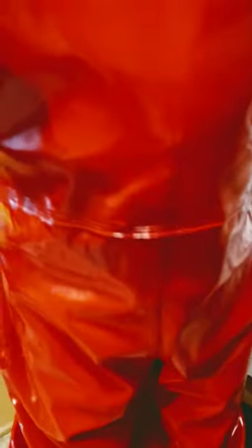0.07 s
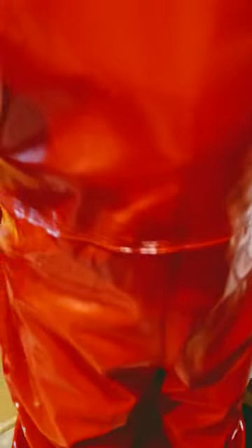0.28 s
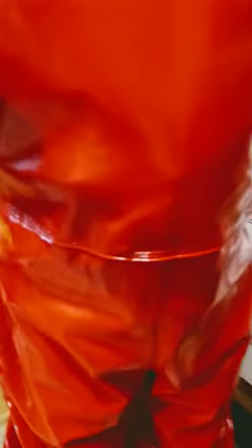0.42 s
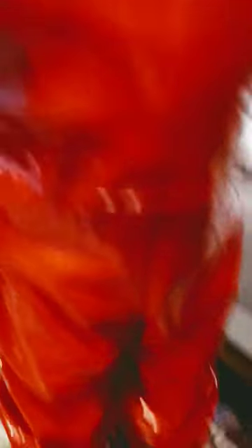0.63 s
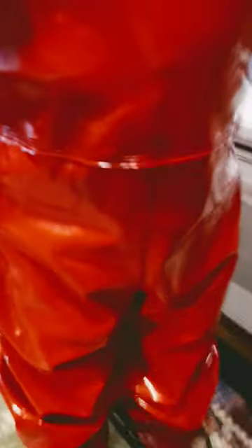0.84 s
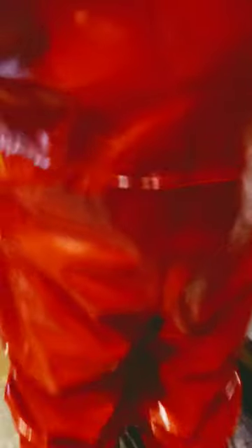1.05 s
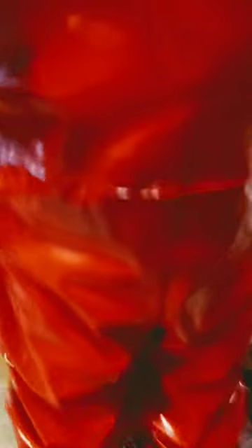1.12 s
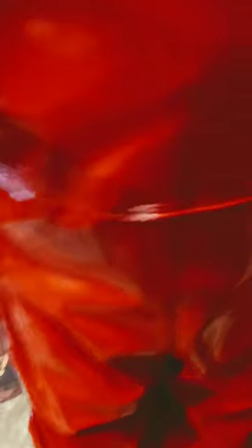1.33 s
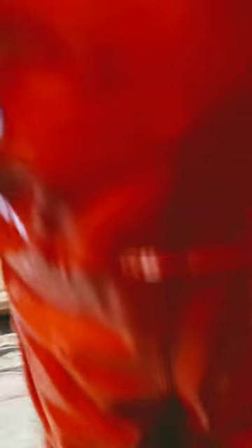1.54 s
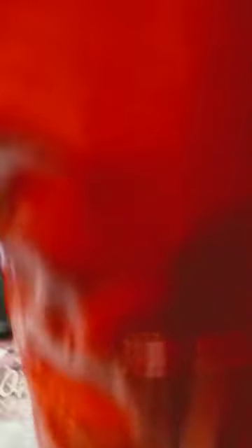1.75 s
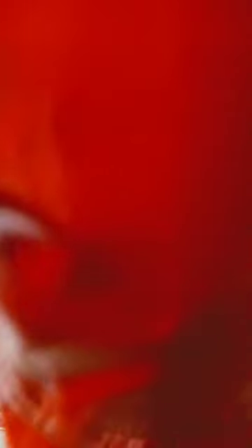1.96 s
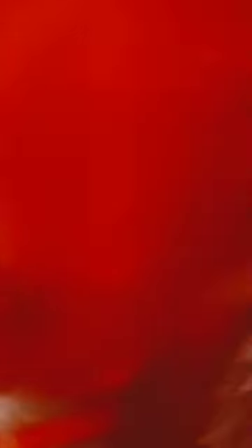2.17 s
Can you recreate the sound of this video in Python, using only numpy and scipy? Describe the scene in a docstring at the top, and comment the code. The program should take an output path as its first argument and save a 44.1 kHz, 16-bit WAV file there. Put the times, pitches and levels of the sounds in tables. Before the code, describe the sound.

Stiff, shiny coated fabric crinkling and snapping sharply right against the microphone, in a quiet room

```python
"""Stiff coated suit rubbing two microphone ports

A person in a stiff, shiny coated suit moves about indoors, the fabric right against the left and right ports.
Folds brush over each port: grainy noise split into rumble, scrape and hiss, each with its own level.
Creases buckle with sharp snaps: a break, decaying micro-cracks and a push of air, ringing the port's cavity.
Each side leaks weakly to the other, over a faint room tail and a quiet steady room tone."""
import sys
import numpy as np
from scipy import signal
from scipy.fft import rfft, irfft, next_fast_len
from scipy.io import wavfile
from scipy.ndimage import uniform_filter1d, map_coordinates

SR = 44100
rng = np.random.default_rng(int(sys.argv[2]) if len(sys.argv) > 2 else 0)


def output_pcm(signal):
    """Save a mono or channel-first signal as 16-bit PCM at the path in sys.argv[1].

    Samples are clipped to [-1, 1] before scaling.
    """
    pcm = np.clip(np.atleast_2d(signal).T, -1, 1) * 32767
    wavfile.write(sys.argv[1], SR, np.round(pcm).astype(np.int16))


N = 97020  # 2.2 s of samples


def amp(db):
    """Decibels to gain."""
    return 10 ** (np.asarray(db) / 20)


def unit(x):
    """Scale a signal to rms 1."""
    return x / np.sqrt(np.mean(x ** 2) + 1e-20)


def colour(points, hz):
    """Gain interpolated between (f/Hz, level/dB) points on a log frequency axis."""
    f, db = np.transpose(points)
    return amp(np.interp(np.log(hz + 1), np.log(f), db))


def filtered(x, response):
    """Filter x by a complex response of frequency, padded so that tails do not wrap round."""
    padded = next_fast_len(N + SR // 2)
    hz = np.fft.rfftfreq(padded, 1 / SR)
    return irfft(rfft(x, padded) * response(hz), padded)[..., :N]


def wobble(rate):
    """A smooth random curve with `rate` knots a second."""
    knots = rng.standard_normal(N // 4)
    return map_coordinates(knots, [np.arange(N) * rate / SR], mode="wrap")


# steady background colour at each port: (f/Hz, relative level/dB)
LEFT_TONE_COLOUR = [(30, -22.5), (160, 1), (600, -13.5), (2200, -18), (6000, -33)]
RIGHT_TONE_COLOUR = [(30, -12), (200, 5.5), (1300, -21.5), (10000, -18.5), (15000, -26.5)]
LEFT_TONE_DB, RIGHT_TONE_DB = -69.5, -76  # rms before the microphone


def room_tone(spectrum, db):
    """Quiet steady background: noise shaped by a fixed spectrum."""
    noise = rng.standard_normal(N)
    return amp(db) * unit(filtered(noise, lambda hz: colour(spectrum, hz)))


FOLD_DB = 3  # rms depth of the shifting resonances


def folded(x, size=512):
    """Short-lived resonances that come and go as the folds change shape."""
    spectrogram = signal.stft(x, nperseg=size)[2]
    field = rng.standard_normal(spectrogram.shape)
    field = uniform_filter1d(field, 3, axis=0)  # smooth across frequency
    field = uniform_filter1d(field, 7, axis=1)  # smooth across time
    return signal.istft(spectrogram * amp(FOLD_DB * unit(field)), nperseg=size)[1][:N]


# folds sliding over a port; rise and fall are the times to cover 20 dB:
# (t/s at full level, hold/s, rise/s, fall/s, rumble level/dB, scrape level/dB, hiss level/dB)
LEFT_RUBS = [(0.22, 0.0097, 0.0068, 0.025, -20, -28, -37.5), (0.324, 0.012, 0.02, 0.02, -56, -62.5, -57.5),
             (0.484, 0.014, 0.041, 0.021, -37.5, -52.5, -89),
             (0.518, 0.072, 0.041, 0.16, -61, -64.5, -69.0),
             (0.614, 0.0053, 0.025, 0.062, -64, -53.5, -52.5),
             (0.732, 0.043, 0.029, 0.039, -43, -38, -46.5),
             (0.854, 0.0033, 0.028, 0.043, -41, -40.5, -51.5), (0.937, 0.04, 0.023, 0.064, -54, -61.5, -71),
             (1.023, 0.0057, 0.0092, 0.092, -51.5, -58.5, -64), (1.214, 0.045, 0.058, 0.066, -63, -62, -64),
             (1.369, 0.0088, 0.003, 0.012, -53, -45, -59), (1.441, 0.017, 0.11, 0.1, -42.5, -42.5, -55),
             (1.527, 0.021, 0.0083, 0.2, -52.5, -45, -66), (1.615, 0.005, 0.0035, 0.088, -38.5, -40, -47.5),
             (1.669, 0.087, 0.031, 0.015, -49, -47.5, -57), (1.784, 0.079, 0.041, 0.11, -56.5, -49.5, -65),
             (1.927, 0.064, 0.012, 0.077, -49.5, -45.0, -45),
             (2.018, 0.031, 0.0082, 0.07, -49.5, -46.5, -65.0),
             (2.16, 0.048, 0.014, 0.05, -61.5, -45.5, -47.5)]
RIGHT_RUBS = [(0.214, 0.0086, 0.005, 0.026, -46.5, -49, -50),
              (0.484, 0.0041, 0.015, 0.022, -38.5, -55, -79), (0.741, 0.051, 0.028, 0.064, -44, -74, -90),
              (1.022, 0.001, 0.01, 0.017, -49.5, -71.5, -68.5),
              (1.298, 0.0041, 0.04, 0.0051, -49.5, -62, -54),
              (1.326, 0.015, 0.003, 0.0062, -41, -54.5, -50),
              (1.37, 0.0034, 0.0044, 0.028, -29, -46, -30.5), (1.453, 0.016, 0.061, 0.078, -46.5, -42, -31),
              (1.529, 0.042, 0.01, 0.016, -45.5, -53.5, -40),
              (1.613, 0.011, 0.0014, 0.062, -42.5, -47, -32), (1.675, 0.068, 0.055, 0.016, -49, -45, -37),
              (1.797, 0.044, 0.028, 0.099, -54.5, -49.5, -49.5),
              (2.141, 0.0037, 0.049, 0.088, -57, -54.5, -63.5)]
# colour of the rubbing at each port: (f/Hz, relative level/dB)
LEFT_RUB_COLOUR = [(30, -42), (60, 1), (140, 8.5), (220, -1.5), (400, -6), (650, -7.5), (950, 0.5),
                   (1400, -6.5), (2400, -9), (3700, -17.5), (5200, -14.5), (7300, -18), (9700, -18.5),
                   (13000, -29), (15000, -33)]
RIGHT_RUB_COLOUR = [(30, -16.5), (70, -14.5), (130, -8.5), (240, -4.5), (450, -5), (750, -1.5),
                    (1400, -4.5), (2100, -13), (3500, -13), (5400, -21.5), (7500, -11.5), (10000, -8.5),
                    (11500, -16.5), (13400, -11), (15000, -36.5)]
# depth of a fold's uneven drag: one value each for rumble, scrape and hiss [depth/dB]
JUDDER_DEPTH_DB = [5, 3, 1.47]
JUDDER_PER_S = 130  # knots in the uneven drag
RUMBLE_TOP_HZ, HISS_FROM_HZ = 324, 3900
GRAIN_PER_S, GRAIN_DB = 900, 1.5  # tiny slips of the coating: knots a second, depth
CRACKLE_PER_S, CRACKLE_SIZE = 280, 2.45  # small creases giving way inside a rub


def below(hz, edge):
    """Gain of a third-order low-pass at the edge."""
    return 1 / np.sqrt(1 + (hz / edge) ** 6)


def above(hz, edge):
    """High-pass gain whose power complements the low-pass."""
    return np.sqrt(1 - below(hz, edge) ** 2)


def rubs(strokes, spectrum):
    """Grainy friction in three bands at one port; each fold swells, holds and slides off."""
    t = np.arange(N) / SR
    slips = unit(rng.standard_normal(N) * amp(GRAIN_DB * wobble(GRAIN_PER_S)))
    crackle = (rng.random(N) < CRACKLE_PER_S / SR) * rng.standard_normal(N) * CRACKLE_SIZE
    friction = folded(slips) + crackle
    drag = wobble(JUDDER_PER_S)

    power = np.zeros((3, N))  # strokes add as power, since their noises are unrelated
    for start, hold, rise, fall, *levels_db in strokes:
        swell = np.maximum(start - t, 0) / rise
        slide_off = np.maximum(t - start - hold, 0) / fall
        shape_db = -20 * (swell + slide_off)
        power += np.outer(amp(levels_db), amp(shape_db)) ** 2

    bands = [lambda hz: below(hz, RUMBLE_TOP_HZ),
             lambda hz: above(hz, RUMBLE_TOP_HZ) * below(hz, HISS_FROM_HZ),
             lambda hz: above(hz, HISS_FROM_HZ)]
    out = np.zeros(N)
    for band_power, band, depth_db in zip(power, bands, JUDDER_DEPTH_DB):
        juddering = friction * amp(depth_db * drag)
        texture = unit(filtered(juddering, lambda hz: band(hz) * colour(spectrum, hz)))
        out += np.sqrt(band_power) * texture
    return out


LAG_S_PER_HZ = 7e-8  # delay per Hz; spreads a click into a few quick cycles


def click(centre_hz, octaves, size=8192):
    """A click of energy 1 with a bell-shaped spectrum; its treble trails its bass a little."""
    hz = np.fft.rfftfreq(size, 1 / SR)
    gain = np.exp(-.5 * (np.log2((hz + 1) / centre_hz) / octaves) ** 2) + .0001
    # folding the cepstrum gives minimum phase: the energy comes as early as it can
    cepstrum = irfft(np.log(gain))
    cepstrum[1:size // 2] *= 2
    cepstrum[size // 2 + 1:] = 0
    lag_phase = np.pi * LAG_S_PER_HZ * hz ** 2
    wave = irfft(np.exp(rfft(cepstrum) - 1j * lag_phase))
    wave = wave * np.cos(np.pi / 2 * np.arange(size) / size) ** 2  # fade out
    return wave / np.linalg.norm(wave)


# creases buckling: (t/s, port 0 left 1 right, level/dB over 1 ms, centre f/Hz, width/octaves,
# crumple decay/s, push of air level/dB relative to the crack)
SNAPS = [ (.2147, 0, -17.5, 3800, 0.94, 0.00042, 1.5), (0.2141, 0, -14, 197, 0.55, .0001, -16),
         (0.2173, 0, -14, 3520, 0.87, 0.00022, -13), (0.4036, 0, -29.5, 170, 1.11, 0.00012, -9.5),
         (0.4189, 0, -20.5, 3020, .68, 0.000088, -10.5), (0.4223, 1, -15.5, 7350, 1.45, 0.00036, -15),
         (.4238, 0, -15, 5900, 3.9, 0.0012, -18), (0.4695, 1, -15, 5300, 1.4, 0.00042, -36),
         (0.4711, 0, -18.5, 1670, 0.71, 0.0006, -15.5), (0.4817, 1, -32.5, 9000, 1, 0.0015, 5),
         (0.4829, 1, -28.5, 500, 1.4, 0.00044, -39), (0.6752, 0, -25, 2230, 0.57, 0.00014, -12),
         (.7590, 0, -26.5, 895, 0.15, 0.0038, -8), (0.8078, 1, -18.5, 3350, 1.18, 0.00015, -15),
         (.8095, 0, -19.5, 1180, 0.93, 0.000055, -11), (0.8529, 1, -27.5, 7200, 1.6, 0.0015, -23),
         (0.8546, 0, -26, 8200, 1.25, 0.00026, -16), (0.969, 0, -40.5, 123, 0.55, 0.00022, -12),
         (1.247, 1, -24.5, 3920, 0.92, 0.0006, -22), (1.2496, 0, -27, 1500, 0.85, 0.00033, -11),
         (1.271, 1, -37, 8140, 1, 0.0021, -29), (1.5285, 0, -31.5, 2960, 0.8, 0.00039, -18),
         (1.6132, 1, -29, 8700, 0.48, .0008, -8.5), (1.6208, 0, -35.5, 8000, 0.62, 0.00039, 1.5),
         (1.6210, 0, -24, 128, 0.47, .0005, -35), (1.7845, 0, -32, 7100, 1.5, 0.00083, -12),
         (1.7847, 1, -30.5, 8300, 0.63, 0.0019, -25), (1.9306, 0, -13.5, 2790, .62, 0.00021, -17.5), ]
# cavity behind the left and the right port: (f/Hz, width/Hz, ring level/dB relative to the direct sound)
CAVITIES = [(7500, 500, -1.5), (8150, 74, 1.5)]
PUSH_HZ, PUSH_OCTAVES = 410, 0.52  # air shoved by a buckling panel
CRUMPLE = 0.9  # initial strength of the micro-cracks, first break = 1


def cavity(hz):
    """Direct sound plus one resonance for each port."""
    return np.array([1 + amp(db) * 1j * hz * width / (centre ** 2 - hz ** 2 + 1j * hz * width)
                     for centre, width, db in CAVITIES])


def snaps(size=8192):
    """Each crease breaks, crumples for a moment, shoves air and rings the port's cavity."""
    out = np.zeros((2, N + size))
    t = np.arange(size) / SR
    for start, port, db, centre_hz, octaves, crumple_s, push_db in SNAPS:
        cracks = CRUMPLE * rng.standard_normal(size) * np.exp(-t / crumple_s)
        cracks[0] = 1  # the first break
        crack = signal.fftconvolve(cracks, click(centre_hz, octaves))[:size]
        push = amp(push_db) * click(PUSH_HZ, PUSH_OCTAVES)
        wave = crack / np.linalg.norm(crack) + push
        first = round(start * SR)
        # the square root turns unit energy into rms 1 over 1 ms
        out[round(port), first:first + size] += amp(db) * np.sqrt(SR / 1000) * wave
    return filtered(out[:, :N], cavity)


# sound reaching the opposite port: (f/Hz, level/dB)
ACROSS_COLOUR = [(100, -28), (300, -28.5), (600, -10), (1500, -26.5), (5000, -26.5), (9000, -22)]
ACROSS_S = 0.0002884  # travel time between the ports


def across(near):
    """Each side leaks to the opposite port, coloured and delayed by the path between them."""
    return filtered(near[::-1], lambda hz: colour(ACROSS_COLOUR, hz) * np.exp(-2j * np.pi * hz * ACROSS_S))


ROOM_DB, ROOM_T60_S = -36, 0.62  # tail level, time to fall 60 dB


def room(near):
    """A faint, short answer of the room: both sides mixed into decaying noise tails."""
    t = np.arange(SR // 2) / SR
    tail = rng.standard_normal((2, len(t))) * amp(-60 * t / ROOM_T60_S)
    tail = tail / np.linalg.norm(tail[0])
    mono = near.mean(axis=0)[None]
    return amp(ROOM_DB) * signal.fftconvolve(mono, tail, axes=1)[:, :N]


def scene():
    """Each port hears its own fabric closely and the other side's weakly, over room tone."""
    tone = np.array([room_tone(LEFT_TONE_COLOUR, LEFT_TONE_DB), room_tone(RIGHT_TONE_COLOUR, RIGHT_TONE_DB)])
    rubbing = np.array([rubs(LEFT_RUBS, LEFT_RUB_COLOUR), rubs(RIGHT_RUBS, RIGHT_RUB_COLOUR)])
    near = rubbing + snaps()
    return near + across(near) + room(near) + tone


OVERLOAD = .5  # ceiling that peaks bend towards, full scale = 1
LOW_CUT_HZ, MIC_ROLLOFF_HZ = 45, 11950
TOP_HZ, TOP_SLOPE_HZ = 16600, 1500  # band limit, width of the slope down to it


def record(dry):
    """The microphone bends peaks softly, thins deep bass, dulls high treble and stops at its band limit."""
    held = dry / (1 + (dry / OVERLOAD) ** 4) ** .25

    def microphone(hz):
        band_limit = np.clip((TOP_HZ - hz) / TOP_SLOPE_HZ, 0, 1)
        rolloff = 1 / np.sqrt(1 + (hz / MIC_ROLLOFF_HZ) ** 20)
        low_cut = (1j * hz / (1j * hz + LOW_CUT_HZ)) ** 2
        return band_limit * rolloff * low_cut

    return filtered(held, microphone)


dry = scene()
out = record(dry)
output_pcm(out)
```